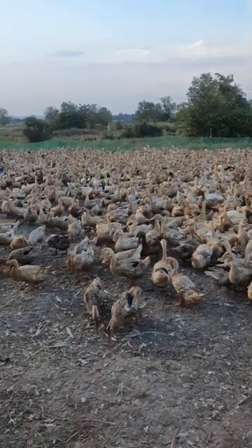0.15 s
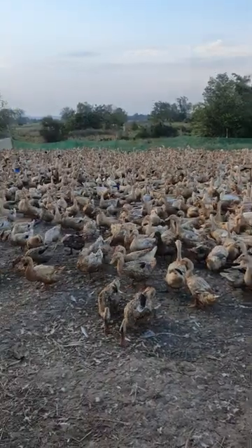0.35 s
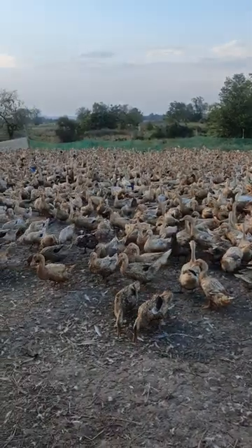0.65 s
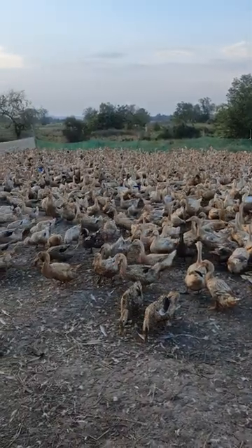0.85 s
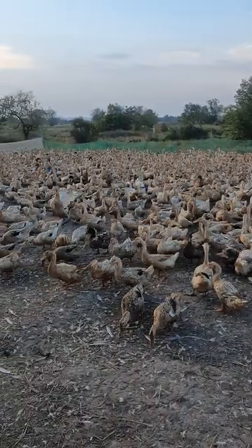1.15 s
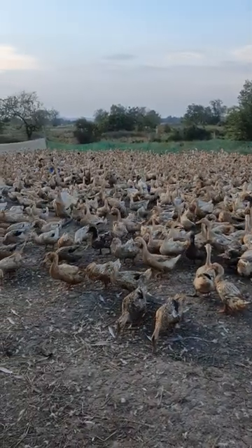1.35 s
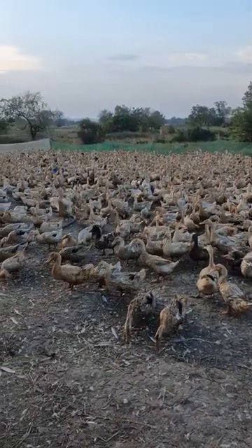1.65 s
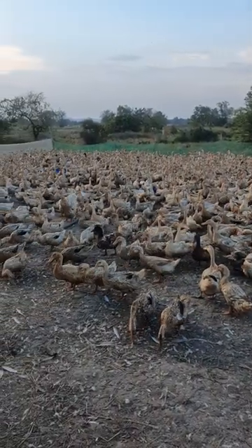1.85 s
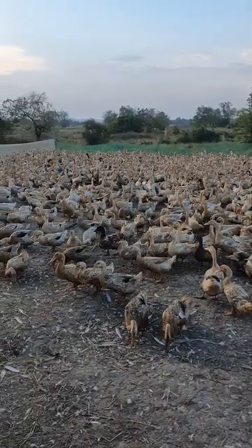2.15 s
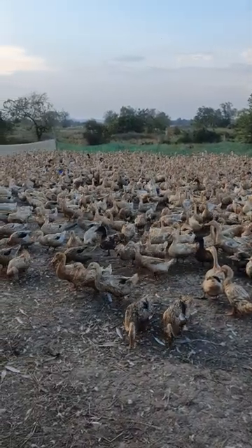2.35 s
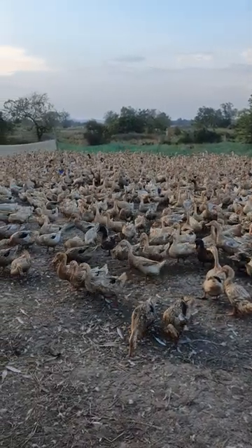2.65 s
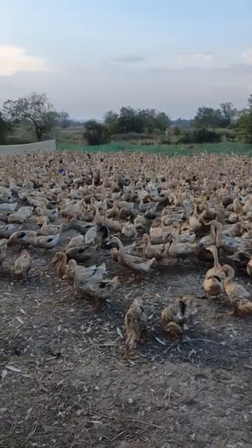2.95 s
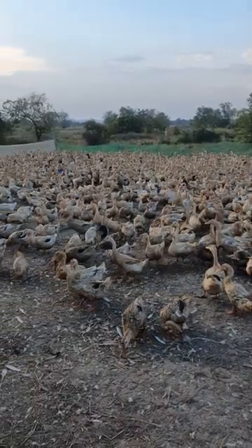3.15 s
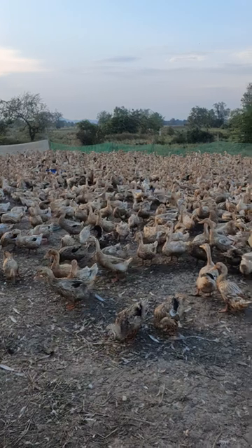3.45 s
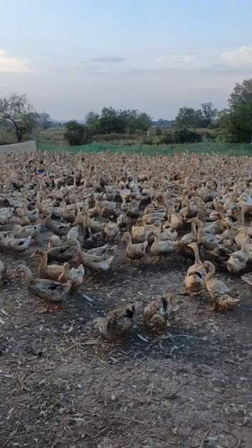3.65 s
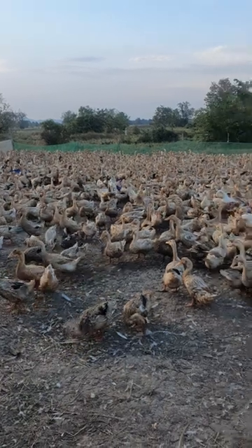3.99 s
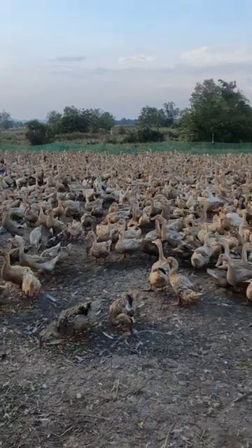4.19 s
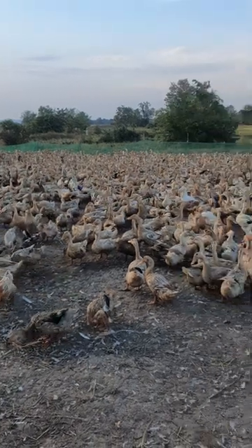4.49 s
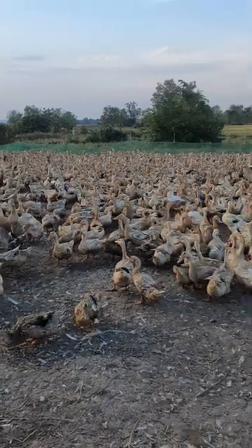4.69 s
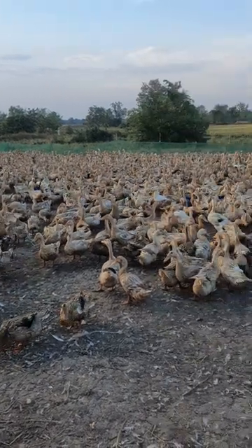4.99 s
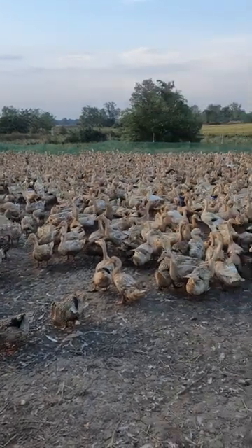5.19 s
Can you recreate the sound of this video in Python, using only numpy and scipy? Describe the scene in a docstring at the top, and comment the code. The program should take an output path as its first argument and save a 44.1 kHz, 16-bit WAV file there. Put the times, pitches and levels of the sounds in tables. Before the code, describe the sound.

A huge duck flock chatters in dense raspy quacks outdoors while wind gusts thump and rumble against the microphone.

```python
"""Duck flock in a gusty field

Near ducks stand out as short raspy quacks, grunts and squeaks: rough pulses drive sliding resonances.
Behind them the calls of 125 random voices blur together, with a short scattered tail over all the birds.
A gust buffets two microphone ports: lumpy noise rumbles, windowed cycles thump and flap.
Underneath lie a faint hiss and filtered noise snaps, the ticks of feet on dry litter.
"""
import sys
import numpy as np
from scipy import signal
from scipy.fft import rfft, irfft
from scipy.io import wavfile
from scipy.ndimage import uniform_filter1d

SR = 44100
rng = np.random.default_rng(int(sys.argv[2]) if len(sys.argv) > 2 else 0)


def write(x):
    x = np.atleast_2d(x).T
    wavfile.write(sys.argv[1], SR, np.round(np.clip(x, -1, 1) * 32767).astype(np.int16))


N = 235008  # length in samples

# Near quacks; length is nominal, levels before the field's tail, the last two relative to the windpipe:
# start_s, length_s, level_db, pulse_hz, roughness_0_to_1, windpipe_start_hz, windpipe_end_hz,
# windpipe_width_hz, chest_db, upper_db
NEAR_QUACKS = [(0.045, 0.06, -42, 235.3, 0.4, 1600, 1650, 480.0, -21, -16),
               (0.092, 0.045, -41, 166, 0.36, 1610, 1450, 430.0, -21, -23.5),
               (0.162, 0.02, -50, 107.6, 0.52, 1490.0, 1500.0, 340.0, -25.0, -21),
               (0.187, 0.08, -47.5, 135.1, 0.54, 1520, 1500, 340.0, -2.5, -24),
               (0.312, 0.073, -47, 106.7, 0.57, 1570, 1440, 420.0, -25.0, -18),
               (0.379, 0.077, -51.5, 141.7, 0.63, 1430.0, 1530, 400.0, -14, -18),
               (0.445, 0.042, -44, 164.2, 0.34, 1510, 1690, 360.0, -25.0, -21),
               (0.482, 0.043, -47, 154.6, 0.44, 1460.0, 1470, 418, -25.0, -31),
               (0.556, 0.043, -48.5, 109.5, 0.68, 1510, 1480, 330.0, -23, -22),
               (0.592, 0.042, -42, 181.0, 0.4, 1620.0, 1580, 410.0, -24, -20.5),
               (0.751, 0.079, -38.5, 164.7, 0.34, 1300, 1540, 493, -32, -29),
               (0.837, 0.017, -41, 107.5, 0.55, 1590, 1600, 270.0, -8, -21.5),
               (0.867, 0.046, -53, 141.5, 0.13, 1540, 1450.0, 420.0, -23, -10),
               (0.918, 0.018, -49, 141, 0.4, 1350, 1340, 590.0, -25.0, -19),
               (0.944, 0.11, -46.5, 173.8, 0.35, 1320, 1550, 488, -30, -27),
               (1.042, 0.029, -41, 152.9, 0.43, 1520, 1530, 320.0, -5, -21),
               (1.074, 0.033, -46, 148.1, 0.12, 1550, 1420, 390.0, -4, -17.5),
               (1.114, 0.032, -47.5, 149, 0.33, 1380, 1530, 470.0, -26, -28),
               (1.182, 0.034, -41.5, 159.4, 0.52, 1160, 1330, 440.0, -24, -44),
               (1.233, 0.031, -37.5, 289.7, 0.32, 1620, 1530, 460.0, -4, -24),
               (1.263, 0.03, -37.5, 286.4, 0.45, 1480, 1380, 260.0, -8.5, -23),
               (1.322, 0.041, -47.5, 137.6, 0.55, 1300.0, 1430, 630.0, -4, -29),
               (1.388, 0.025, -52, 171.2, 0.2, 1540.0, 1540.0, 330.0, -27, -32),
               (1.417, 0.034, -38, 222.8, 0.4, 1350, 1350, 289, -4, -18.5),
               (1.452, 0.023, -38, 225, 0.44, 1350, 1500, 395, -25.0, -18.5),
               (1.536, 0.055, -48.5, 166.5, 0.38, 1420, 1410, 480.0, -16, -18),
               (1.62, 0.059, -41.5, 107.8, 0.44, 1410, 1470, 328, -1.5, -21.5),
               (1.716, 0.046, -40.5, 160.3, 0.24, 1260, 1330, 496, -28, -37),
               (1.823, 0.056, -39.5, 109.2, 0.53, 1180, 1500, 634, -25, -28),
               (1.901, 0.055, -43, 108.8, 0.7, 1440, 1470, 490.0, -25, -22),
               (1.949, 0.048, -42.5, 110.6, 0.65, 1250, 1150, 524, -1.5, -22),
               (2.014, 0.058, -38.5, 109.1, 0.6, 1230, 1500, 670.0, -25.0, -25),
               (2.048, 0.08, -38, 321.6, 0.16, 1580, 1620.0, 420.0, -12, -22),
               (2.115, 0.033, -37, 162.7, 0.39, 1580, 1550, 408, -6.5, -24.5),
               (2.215, 0.046, -40, 243.6, 0.39, 1540, 1550, 340.0, -27, -21),
               (2.276, 0.035, -49.5, 106.7, 0.14, 1050, 1080, 410.0, -27, -37),
               (2.343, 0.04, -34.5, 171, 0.3, 1520, 1190, 420, -23, -27.5),
               (2.408, 0.051, -37.5, 187.6, 0.28, 1540, 1410, 342, -23, -20.5),
               (2.506, 0.052, -35, 170.9, 0.54, 1310, 1390, 367, -32, -48),
               (2.575, 0.046, -40.5, 177.8, 0.32, 1410, 1460, 327, -28, -23.5),
               (2.628, 0.048, -43.5, 165.8, 0.4, 1670, 1500, 360.0, -23, -24),
               (2.685, 0.06, -34.5, 182.4, 0.31, 1385, 1410, 296, -23, -27.5),
               (2.771, 0.032, -49.5, 149.4, 0.5, 1550.0, 1150.0, 760.0, -25.0, -20),
               (2.832, 0.023, -42.5, 177.2, 0.2, 1470, 1430, 500, -21, -25),
               (2.855, 0.024, -35, 170, 0.21, 1380, 1440, 190.0, -23, -31),
               (2.904, 0.11, -43, 159.7, 0.5, 1410, 1360, 333, -25.0, -23),
               (3.03, 0.07, -44.5, 135.5, 0.48, 1470, 1540, 340.0, 3, -19.5),
               (3.106, 0.068, -56, 152.7, 0.5, 1570.0, 1280, 635, -20, -12),
               (3.219, 0.088, -40.5, 277.4, 0.29, 1470, 1580, 463, -33, -20),
               (3.339, 0.054, -46, 160, 0.54, 1610.0, 1550, 430.0, -28, -18),
               (3.433, 0.042, -53, 107.8, 0.2, 1450.0, 1480, 560.0, -25.0, -18),
               (3.473, 0.087, -45, 140.5, 0.44, 1280, 1480, 420.0, -31, -18),
               (3.552, 0.13, -45.5, 108.9, 0.33, 1430, 1530, 374, -25, -25),
               (3.763, 0.091, -39.5, 289.3, 0.31, 1610.0, 1680, 433, -20, -23),
               (3.931, 0.099, -41.5, 153.4, 0.35, 1360, 1550, 530, -7, -19),
               (4.077, 0.02, -46.5, 175.2, 0.24, 1380, 1230, 494, -27, -23),
               (4.138, 0.075, -46.5, 154.3, 0.49, 1380, 1550, 640.0, -38, -23),
               (4.214, 0.034, -48, 166.8, 0.38, 1560, 1680, 550.0, -13, -22),
               (4.245, 0.082, -48, 143.1, 0.43, 1460, 1160, 624, -7, -19),
               (4.433, 0.065, -41.5, 288.8, 0.35, 1460, 1290, 405, -16, -22),
               (4.668, 0.041, -53, 160.0, 0.4, 1600, 1560, 360.0, -25.0, -14),
               (4.713, 0.043, -41.5, 165.6, 0.15, 1510, 1520, 380.0, -12, -21.5),
               (4.787, 0.051, -42.5, 148.6, 0.36, 1520, 1480, 453, -15, -28),
               (4.85, 0.031, -53, 108.7, 0.33, 1420, 1340, 300.0, -25.0, -15),
               (4.922, 0.086, -45, 164.3, 0.44, 1410, 1380, 554, -23, -22.5),
               (4.993, 0.036, -46.5, 155.2, 0.23, 1540, 1610, 452, -27, -20),
               (5.024, 0.037, -43.5, 295, 0.19, 1770, 1720, 280, -27, -24),
               (5.123, 0.067, -43, 226, 0.18, 1740, 1550, 404, -25.0, -22),
               (5.175, 0.031, -42.5, 160.7, 0.3, 1370, 1360, 330.0, -8, -29),
               (5.214, 0.04, -41, 167.0, 0.36, 1500, 1410, 380.0, -31, -28),
               (5.26, 0.085, -42, 160.9, 0.46, 1310, 1390, 426, -26, -29)]
# Low grunts with the bill shut: start_s, length_s, level_db, pulse_hz, resonance_hz
LOW_GRUNTS = [(.645, 0.029, -49, 129.3, 1250), (.76, 0.029, -50, 162, 1170), (.97, .04, -48.5, 160.4, 1150),
              (1.82, 0.035, -42, 108, 1060), (1.95, 0.041, -46, 109.2, 1100),
              (2.014, 0.044, -41.5, 108.7, 1060), (2.135, 0.012, -48, 118.5, 950),
              (2.278, 0.034, -44, 113.5, 1050), (2.365, 0.021, -46, 170.3, 1240),
              (2.5, 0.037, -44, 169.3, 1000), (2.797, .015, -50, 119, 804), (3.21, 0.044, -47, 130, 1110),
              (3.26, 0.041, -49.5, 140.8, 1070), (3.49, 0.039, -47.5, 134.7, 1140),
              (3.76, 0.034, -48, 138, 1050), (3.93, 0.053, -46.5, 111.8, 1060),
              (4.15, 0.039, -53, 150, 1070), (4.284, 0.033, -50.5, 141, 1060),
              (4.44, 0.045, -56, 138.9, 970), (4.81, 0.039, -48.5, 111.8, 610),
              (5.0, .04, -59, 149.4, 1010), (5.16, 0.035, -47.5, 108.9, 635)]
# Thin high squeaks among the calls: start_s, length_s, level_db, resonance_hz
HIGH_SQUEAKS = [(0.04, 0.05, -56, 4240), (0.048, 0.024, -54, 2800), (0.07, 0.094, -52, 2250),
                (0.476, 0.018, -52, 2330), (0.157, 0.025, -61, 3730), (0.695, 0.017, -56, 2470),
                (0.774, 0.045, -55.5, 3200), (0.958, 0.047, -54.5, 3210), (1.02, 0.024, -58, 3220),
                (1.13, 0.031, -51.5, 3100), (1.223, 0.081, -56.5, 3130), (1.254, 0.068, -61, 4760),
                (1.346, 0.025, -60, 3080), (1.415, 0.063, -53, 3120), (1.425, 0.045, -58, 4600),
                (1.616, 0.082, -57, 3250), (1.832, 0.043, -58.5, 3240), (1.88, 0.027, -56, 2490),
                (2.055, 0.07, -53, 2290), (2.118, 0.044, -56.5, 3240), (2.198, 0.028, -56, 6250),
                (2.206, 0.045, -54, 2760), (2.435, 0.043, -56, 3190), (2.697, 0.033, -55, 2760),
                (3.067, 0.051, -58.5, 5600), (3.236, 0.075, -55, 4800), (3.514, 0.073, -59, 5600),
                (3.772, 0.1, -54, 1980), (3.797, 0.035, -55, 5640), (3.961, 0.036, -61, 4370),
                (4.701, 0.055, -61, 5300)]
# Two upper resonances of the voice: centre_hz (before any shift by the bird), width_hz
UPPER_RESONANCES = [(2650, 440), (4700, 3440)]
# Level of the birds further back, before the field's tail: time_s, level_db
FLOCK_LEVEL = [(0.0, -41.5), (1.19, -42), (1.5, -41), (2.58, -39), (2.9, -42), (3.34, -42.5), (3.78, -44.5),
               (4.26, -44.5), (4.51, -48.5), (4.76, -41), (4.88, -45), (5.1, -42.5), (5.33, -41.5)]
# Phase by which the left port leads the right: frequency_hz, lead_radians
PORT_LEAD = [(0, 0), (600, 0.1), (860, -0.6), (1210, 0.2), (1460, -0.4), (1980, 1.7), (2500, -0.6),
             (3880, 1.0), (4740, 0.6), (6890, 2.5), (11400, 4.1), (13200, 3.0), (14200, 4.0), (16400, 1.5)]
# Single eddies striking the ports: peak_s, level_db, pitch_hz, left_minus_right_db, left_first_ms
EDDY_THUMPS = [(0.11, -27, 90.4, -6, -6), (0.519, -35, 103, 23, -2), (0.886, -32, 102, -6, -5),
               (1.669, -18.5, 109.4, 0, -4), (1.759, -21, 101.7, 4, -2), (1.834, -16.5, 146, -3, 0.4),
               (1.962, -18.5, 92, -1, 1.5), (2.035, -14, 116.5, 4.5, 3.5), (2.266, -25, 146, 26, -2.5),
               (2.311, -20, 94.3, 3, 5), (2.339, -22, 97, -1, -4.5), (2.63, -16, 129, 19.5, 4),
               (2.654, -24.5, 108, 13, 1.5), (2.677, -19, 139, 2, 2.5), (2.82, -25.5, 105.6, 24, 0),
               (2.852, -29, 163, 34, 2.5), (2.867, -32, 148, 39, 3), (2.923, -22.5, 111, 20, 1),
               (2.941, -23, 99.7, 17, 1.5), (2.962, -25, 133, 14, -1.5), (2.994, -19.5, 114, -15, 2.5),
               (3.072, -16, 101, 0, -1), (3.121, -17, 114.4, 2, 0.9), (3.15, -31, 131.5, 25, -3.5),
               (3.168, -21, 106.5, 9, 5.5), (3.315, -24, 87, 0, 7.5), (3.337, -31.5, 94.3, 30, 4.5),
               (3.37, -18, 79, 0, -3), (3.522, -40.5, 108.3, 46, -0.5), (3.56, -36, 123, 36, 1),
               (3.665, -36.5, 104.3, 35, 1.5), (3.876, -37.5, 133, 38, 4.5), (3.912, -28.5, 99, 16, -1.5),
               (3.974, -25.5, 132, 18, 2.5), (4.228, -41, 70.9, 35, -1), (4.736, -22, 120, -9.5, -3)]
# Sharp flaps of the gust on a port: start_s, level_db, pitch_hz, left_minus_right_db
PORT_FLAPS = [(1.087, -38, 353, -1.0), (2.266, -32, 393, -0.5), (2.727, -31.5, 490, -16),
              (2.799, -28, 433, -10), (2.845, -29, 417, -10), (2.884, -35, 371, -6.0),
              (2.931, -27, 358, -15), (2.997, -30, 406, -6.0), (3.139, -29.5, 563, -16),
              (3.164, -31, 431, -14.5), (3.859, -36, 353, -9), (4.017, -37, 371, -7), (4.195, -39, 406, -3),
              (4.853, -35.5, 490, -11.5), (4.898, -42, 549, -9), (4.916, -40, 614, -3.5)]
# Steady wind; reach mixes from the deep colour at 0 to the fuller one at 1, flutter is at the right port:
# time_s, left_db, right_db, reach, flutter_db
STEADY_WIND = [(0.0, -32, -51, 0.53, -50), (.32, -38.5, -72, 0.73, -50.5), (.7, -32.5, -37.5, 0.58, -55),
               (1.0, -38, -60, 0.81, -51), (1.35, -35.5, -48, 0.69, -49), (1.6, -37.5, -58, 0.67, -69),
               (1.9, -32.5, -46, 0.46, -59), (2.15, -25, -37, 0.46, -54), (2.55, -26.5, -67, 0.37, -49),
               (2.74, -26.5, -62, 0.55, -48), (2.88, -20.5, -58, 0.62, -29), (3.03, -27, -47, 0.7, -67),
               (3.22, -26.5, -61, 0.41, -46.5), (3.55, -24, -59, 0.42, -37.5), (3.85, -31, -60, 0.55, -47),
               (4.2, -33.5, -73, 0.23, -46.5), (4.39, -46, -72, 0.79, -52), (4.8, -36.5, -74, 0.26, -46.5),
               (5.33, -37, -68, 0.65, -41)]
# Puffs added to the steady wind: peak_s, left_db, right_db, flutter_db
WIND_PUFFS = [(.115, -48, -33, -59), (.519, -30.5, -60, -65), (.883, -34, -33.5, -43.5),
              (1.094, -29, -61, -39.5), (1.432, -34, -33, -63), (1.636, -29, -29, -67),
              (1.711, -35, -32, -42.5), (1.766, -43, -25, -60), (1.836, -42, -29, -43),
              (1.96, -25, -23, -36.5), (2.029, -39, -43, -35.5), (2.115, -31, -29, -59),
              (2.268, -24, -45, -37), (2.311, -22.5, -22.5, -59), (2.375, -24, -36, -60),
              (2.445, -31, -46, -34.5), (2.632, -24, -24, -30.5), (2.684, -30, -48, -35),
              (2.815, -30, -57, -30.5), (2.93, -29, -29, -36.5), (2.991, -25, -26, -35.5),
              (3.078, -36, -20, -60), (3.157, -23, -45, -31.5), (3.308, -25, -32, -57),
              (3.372, -36, -48, -38), (3.985, -30, -41, -44), (4.085, -25.5, -65, -42),
              (4.23, -27, -67, -43), (4.47, -30, -69, -56), (4.578, -27.5, -33, -56),
              (4.732, -26, -30.5, -62), (4.949, -27.5, -53, -61), (5.243, -33, -60, -44)]
# Deep tone colour of the wind, shape only: frequency_hz, relative_db_per_hz
DEEP_COLOUR = [(30, -35), (55, 31), (70, -7), (90, -3), (150, -26), (300, -26), (600, -92), (3000, -120)]
# Fuller tone colour of the wind, shape only: frequency_hz, relative_db_per_hz
FULLER_COLOUR = [(30, 6), (55, -15.5), (70, 16.5), (90, -11), (150, -14.5), (300, -5.5), (600, -15),
                 (3000, -120)]
# Tone colour of the field hiss, shape only: frequency_hz, relative_db_per_hz
HISS_COLOUR = [(400, -33), (700, 19), (2000, 8), (4000, 8), (7700, -4), (12000, 0.5), (16000, -4.5)]
# Louder feet on litter: start_s, level_db, left_minus_right_db
FOOT_TICKS = [(0.2389, -50, -1.0), (0.4244, -47, -1.5), (0.4858, -47, 0.0), (1.438, -47, -1.5),
              (1.7609, -48, 1.5), (2.0293, -57, 0.5), (2.3965, -45, 0.0), (3.7474, -54, 1.0),
              (3.9414, -55, 0.5), (3.9564, -48, 3), (4.1813, -49, 1.0), (4.939, -43, 0.5), (4.965, -43, 9),
              (5.2086, -46, -2), (5.2465, -44, 8), (5.313, -45, 0.5)]

# Voice: shares of a call over which it swells and fades
ATTACK, RELEASE = 0.29, 0.39
# Throat resonance: share of the windpipe's Hz, dB relative to it
THROAT, THROAT_DB = 0.705, -13
CHEST_HZ, CHEST_WIDTH_HZ = 237.6, 50
# Near birds: left-right balance, then offsets of the two upper resonances from upper_db
NEAR_PAN_DB, SECOND_DB, THIRD_DB = -1, 2.5, 4.5
GRUNT_WIDTH_HZ, GRUNT_ROUGH = 420, .2
SQUEAK_PULSE_HZ, SQUEAK_ROUGH = 235, .19
SQUEAK_WIDTH_HZ, SQUEAK_RISE_HZ, SQUEAK_ARCH_HZ = 340, 120, 260
FLOCK_COUNT = 125  # birds

# Wind: noise inside an eddy, flap decay, slopes of a puff, fine eddies at the right port
RUSH_DB, RUSH_HZ, RUSH_WIDTH_HZ = -24.5, 560, 250
FLAP_CYCLES = 0.4  # cycles from onset to the envelope's peak
PUFF_RISE_DB_PER_S, PUFF_FALL_DB_PER_S = 329, 307
FLUTTER_HZ, FLUTTER_WIDTH_HZ = 386, 284

HISS_DB = -53.5
EDGE_HZ = 15790  # upper band limit


def near_ducks():
    """Raspy quacks, shut-bill grunts and thin squeaks, each a pulsing voice through its own resonance."""
    out = np.zeros((2, N))
    for s, *voice, upper_db in NEAR_QUACKS:
        call = quack(*voice, upper_db + SECOND_DB, upper_db + THIRD_DB)
        add(out, s - .012, call, NEAR_PAN_DB)
    for s, length, db, pulse_hz, hz in LOW_GRUNTS:
        drive = syrinx(length, pulse_hz, GRUNT_ROUGH)
        grunt = glide(drive, hz, hz, GRUNT_WIDTH_HZ)
        add(out, s - .012, gain_of(db) * grunt, NEAR_PAN_DB)
    for s, length, db, hz in HIGH_SQUEAKS:
        drive = syrinx(length - .01, SQUEAK_PULSE_HZ, SQUEAK_ROUGH)
        low_hz, high_hz = hz - SQUEAK_RISE_HZ / 2, hz + SQUEAK_RISE_HZ / 2
        squeak = glide(drive, low_hz, high_hz, SQUEAK_WIDTH_HZ, SQUEAK_ARCH_HZ / hz)
        add(out, s - .008, gain_of(db) * squeak, 0)
    return out


def quack(length, db, pulse_hz, rough, start_hz, end_hz, width, chest_db, second_db, third_db, shift=1):
    """The voice rings a windpipe that slides as the bill moves, a throat, the chest and two upper resonances."""
    drive = syrinx(length, pulse_hz, rough)
    windpipe = glide(drive, start_hz, end_hz, max(width, 200))
    throat = glide(drive, THROAT * start_hz, THROAT * end_hz, 530)
    chest = resonate(resonate(drive, CHEST_HZ, CHEST_WIDTH_HZ), CHEST_HZ, 2 * CHEST_WIDTH_HZ)
    out = windpipe + gain_of(THROAT_DB) * throat - gain_of(chest_db) * evened(chest)

    # The bill rattles after each pulse: noise that dies away quickly
    rattle = signal.lfilter([1], [1, -.975], abs(drive)) * rng.standard_normal(len(drive))
    rasp = 0.81 * evened(drive) + evened(rattle)
    for upper_db, (hz, wide) in zip((second_db, third_db), UPPER_RESONANCES):
        ring = resonate(resonate(rasp, hz * shift, wide), hz * shift, wide)
        out = out - gain_of(upper_db) * evened(ring)
    return gain_of(db) * out


def syrinx(length, pulse_hz, rough):
    """The voice organ: jittered pulses and puffs of breath noise, with a pitch that rises and sags."""
    count = round((length + .025) * SR)
    jitter, breath_noise, size = rng.standard_normal((6500, 3), dtype=np.float32)[:count].T
    u = np.linspace(0, 1, len(jitter))
    pitch_arch = .92 + .12 * np.sin(2.6 * u)
    wobble = 1 + 1.2 * rough * uniform_filter1d(jitter, size=150)
    turns = np.cumsum(pulse_hz * pitch_arch * wobble) / SR
    # One click at each whole turn, of uneven size
    pulses = np.diff(np.floor(turns), prepend=-1) * gain_of(5 * rough * size)
    puffs = (.15 + np.exp(-(turns % 1) / .25)) * breath_noise
    noise_share = np.clip(rough, 0, .6)
    swell = np.sin(np.pi / 2 * np.clip(np.minimum(u / ATTACK, (1 - u) / RELEASE), 0, 1)) ** 2
    drive = ((1 - noise_share) * evened(pulses) + noise_share * evened(puffs)) * swell
    return np.pad(drive, (0, 400))  # room to ring out


def glide(x, start_hz, end_hz, width, arch=0.018):
    """A double resonance that slides and arches as the bill opens and shuts, made by shifting frequency."""
    u = np.linspace(0, 1, len(x))
    straight_hz = start_hz + (end_hz - start_hz) * u
    hz = straight_hz * (1 + arch * (np.sin(np.pi * u) - .7))
    turn = np.exp(2j * np.pi * np.cumsum(hz) / SR)
    r = np.exp(-np.pi * width / SR)
    # Shift down to zero, smooth twice, shift back up
    smooth = signal.lfilter([1], [1, -2 * r, r * r], x / turn)
    return evened((turn * smooth).real)


def breath(calls):
    """Air rushing through the bills: a high hiss that follows the level of the calls."""
    effort = np.sqrt(abs(uniform_filter1d(calls ** 2, size=500, axis=1)))
    air = evened(resonate(rng.standard_normal((N, 2)).T, 5800, 10000))
    return gain_of(-25.0) * effort * air


def flock():
    """Birds of random voice, loudness and bearing, each repeating one call four times, spread evenly in time."""
    out = np.zeros((2, N))
    # Four rounds; in each, every bird takes one time slot in random order
    order = rng.permuted(np.tile(np.arange(FLOCK_COUNT), (4, 1)), axis=1).T
    for slots, traits in zip(order, rng.random((FLOCK_COUNT, 12))):
        when, long, loud, pitch, rough, neck, slide, chest, second, third, bill, bearing = traits
        pipe_hz = 1100 + 780 * neck
        voice = quack(
            length=.015 + .045 * long, db=13 * loud,
            pulse_hz=120 * 2.4 ** pitch, rough=.1 + .26 * rough,
            start_hz=pipe_hz, end_hz=pipe_hz + 450 * (slide - .6), width=320 + 240 * bill,
            chest_db=-14 + 3.4 * chest, second_db=-21 + 2.3 * second, third_db=-23.5 + 7.7 * third,
            shift=0.878 + .5 * bill)
        for slot in slots:
            s = (slot + when) / FLOCK_COUNT * (N / SR)
            add(out, s, voice, 0.82 * (bearing - .5), lag=round(6 * (bearing - .5)))
    out = np.roll(out, round(-.03 * SR), axis=1)  # 30 ms early, wrapping round
    s, db = np.transpose(FLOCK_LEVEL)
    return evened(out) * gain_of(np.interp(np.arange(N) / SR, s, db))


def field(x):
    """Ground and neighbouring bodies scatter the calls into a short tail, other at each port, and dull the top."""
    t = np.arange(5000) / SR
    sparse = rng.standard_normal((2, len(t))) * (rng.random((2, len(t))) < .05)
    taps = sparse * gain_of(-60 * t / .08)  # falls 60 dB in 80 ms
    taps = taps / np.linalg.norm(taps, axis=1, keepdims=True)
    tail = signal.fftconvolve(x, taps, axes=1)[:, :N]
    dull_hz = 7200
    dull = signal.butter(3, dull_hz, fs=SR, output="sos")
    return signal.sosfilt(dull, x + gain_of(-7.5) * tail)


def ports(x):
    """The birds reach the two ports with a phase difference that varies with frequency."""
    lead = read(PORT_LEAD, np.fft.rfftfreq(N, 1 / SR))
    return irfft(rfft(x) * np.exp(.5j * np.array([lead, -lead])), N)


def thumps():
    """Each eddy pushes a port for about a cycle, with a burst of rough noise within it."""
    out = np.zeros((2, N))
    rushes = rng.standard_normal((len(EDDY_THUMPS), 1600))
    for (s, db, hz, pan_db, first_ms), rush in zip(EDDY_THUMPS, rushes):
        u = np.arange(-SR / hz, SR / hz) * hz / SR  # cycles from the peak
        burst = evened(resonate(rush, RUSH_HZ, RUSH_WIDTH_HZ))[:len(u)]
        push = gain_of(RUSH_DB) * burst - np.cos(2 * np.pi * u)
        thump = gain_of(db) * push * np.exp(-(u / 0.36) ** 2)
        # Each port takes half of the time difference
        add(out, s - 1 / hz, thump, pan_db, lag=round(-first_ms * SR / 2000))
    return out


def flaps():
    """Each flap of the gust is a quick push of about one cycle."""
    out = np.zeros((2, N))
    for s, db, hz, pan_db in PORT_FLAPS:
        u = np.arange(0, 4 * SR / hz) * hz / SR  # cycles from the onset
        envelope = u / FLAP_CYCLES * np.exp(1 - u / FLAP_CYCLES)
        add(out, s, gain_of(db) * np.sin(2 * np.pi * u) * envelope, pan_db)
    return out


def wind():
    """Lumpy rumble of turbulence at each port, and a finer flutter in short bursts at the right one."""
    s, _, _, reach, _ = np.transpose(STEADY_WIND)

    def colour(hz, t):
        fuller = np.clip(np.interp(t, s, reach), 0, 1.3)
        return (1 - fuller) * read(DEEP_COLOUR, hz) + fuller * read(FULLER_COLOUR, hz)

    rumble = noise(colour, size=1024, lumpy_db=2.5, patchy_db=4, lump=3, bins=2)
    # Level out the rumble so that the wind levels alone set its loudness
    rumble = rumble / np.sqrt(uniform_filter1d(rumble ** 2, size=5000, axis=1) + 1e-20)
    left, right, flutter = wind_levels()

    eddies, bursts = rng.standard_normal((N, 2)).T
    burst_db = 5 * np.tanh(evened(uniform_filter1d(bursts, size=500)))
    eddies = eddies * gain_of(burst_db)
    eddies = resonate(resonate(eddies, FLUTTER_HZ, FLUTTER_WIDTH_HZ), FLUTTER_HZ, FLUTTER_WIDTH_HZ)
    return np.array([left * rumble[0], right * rumble[1] + flutter * evened(eddies)])


def wind_levels():
    """Steady wind plus puffs, summed as power, that share one rise and one fall: left, right, flutter gains."""
    s, left_db, right_db, _, flutter_db = np.transpose(STEADY_WIND)
    t = np.arange(0, N + 64, 64) / SR
    steady_db = [np.interp(t, s, db) for db in (left_db, right_db, flutter_db)]
    power = gain_of(steady_db) ** 2
    for peak_s, *peak_db in WIND_PUFFS:
        under_db = np.maximum(PUFF_RISE_DB_PER_S * (peak_s - t), PUFF_FALL_DB_PER_S * (t - peak_s))
        power = power + gain_of(np.array(peak_db)[:, None] - under_db) ** 2
    return [np.interp(np.arange(N) / SR, t, np.sqrt(p)) for p in power]


def rustle():
    """A faint field hiss, and dry ticks of feet as short noise snaps: the louder listed, small ones at random."""
    def colour(hz, t):
        return read(HISS_COLOUR, hz) + 0 * t  # the same at all times

    hiss = noise(colour, size=256, lumpy_db=1.1, patchy_db=1.1, lump=5, bins=15)
    out = gain_of(HISS_DB) * evened(hiss)
    small = [(s * N / SR, -63 + 7 * loud, 8 * side - 4) for s, loud, side in rng.random((200, 3))]
    for s, db, pan_db in FOOT_TICKS + small:
        snap = rng.standard_normal(132) * gain_of(-60 * np.arange(132) / SR / 0.013)
        add(out, s, gain_of(db) * resonate(snap, 9700, 8900), pan_db)
    return out


def noise(db_of, size, lumpy_db, patchy_db, lump, bins):
    """Unrelated noise at each port, built in frames; lumps flicker in all bands, patches only in some."""
    hop = size // 4
    frames, hz = N // hop + 5, np.fft.rfftfreq(size, 1 / SR)
    real, imaginary, patches = rng.standard_normal((frames, len(hz), 2, 3)).T
    # Smooth the patches over time, then over neighbouring bands
    patches = uniform_filter1d(patches, lump, axis=2)
    patches = evened(uniform_filter1d(patches, bins, axis=1))
    lumps = evened(uniform_filter1d(rng.standard_normal((frames, 2)).T, lump, axis=1))
    level_db = db_of(hz[:, None], np.arange(frames) * hop / SR)
    level_db = level_db + lumpy_db * lumps[:, None] + patchy_db * patches
    spectrum = (real + 1j * imaginary) * gain_of(level_db)
    return signal.istft(spectrum, nperseg=size, noverlap=size - hop)[1][:, :N]


def resonate(x, hz, width):
    """A two-pole resonance of gain 1 at its peak."""
    return signal.lfilter(*signal.iirpeak(hz, hz / width, SR), x)


def add(mix, s, sound, pan_db, lag=0):
    """Places a sound by level and arrival: lag in samples delays the left port and advances the right."""
    for side, sign in enumerate((1, -1)):
        start = max(round(s * SR) + sign * lag, 0)
        part = mix[side, start:][:len(sound)]
        part += sound[:len(part)] * gain_of(sign * pan_db / 2)


def read(points, hz):
    """Reads a curve between its points on a logarithmic frequency axis."""
    f, value = np.transpose(points)
    return np.interp(np.log(hz + 1), np.log(f + 1), value)


def evened(x):
    """Scales a sound to an RMS level of 1."""
    return x / np.sqrt(np.mean(x ** 2) + 1e-20)


def gain_of(db):
    """Turns decibels into an amplitude factor."""
    return 10 ** (np.asarray(db) / 20)


def scene():
    """Birds across the field, with breath, wind and rustle directly at the ports."""
    near = near_ducks()
    birds = ports(field(near + flock()))
    gust = wind() + thumps() + flaps()
    return birds + breath(near) + gust + rustle()


def record(dry):
    """The microphones lose the deepest bass; a steep filter then limits the band at the top."""
    bass_hz = 38
    dry = signal.sosfilt(signal.butter(2, bass_hz, "high", fs=SR, output="sos"), dry)
    band_limit = signal.firwin(1023, EDGE_HZ, window=("kaiser", 9), fs=SR)
    return signal.oaconvolve(dry, band_limit[None], "same")


dry = scene()
out = record(dry)
write(out)
```